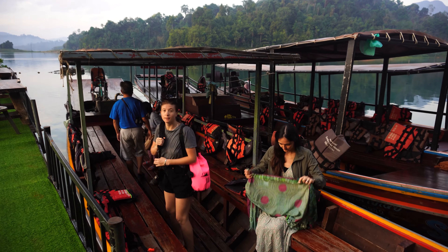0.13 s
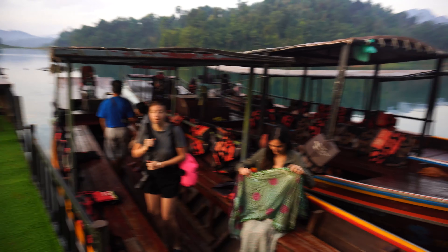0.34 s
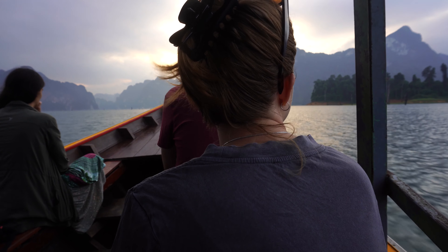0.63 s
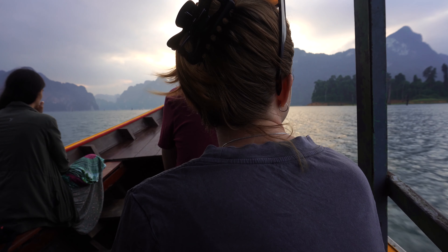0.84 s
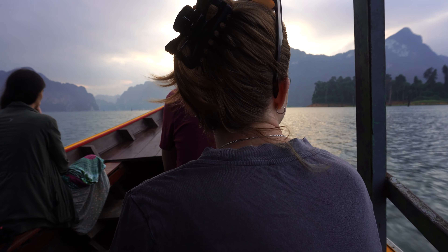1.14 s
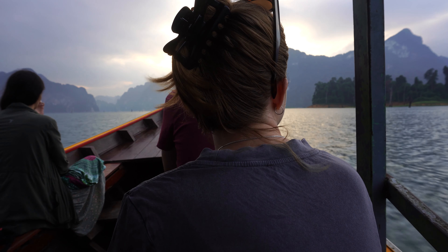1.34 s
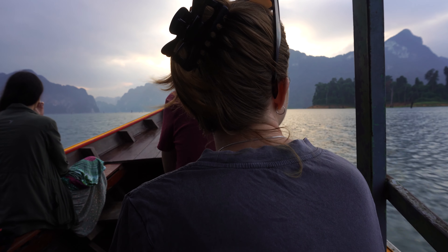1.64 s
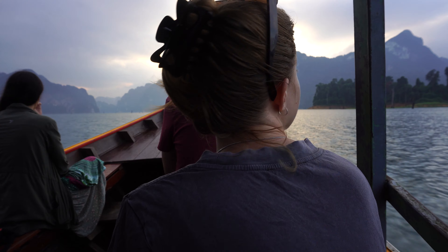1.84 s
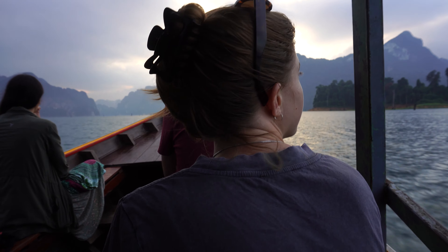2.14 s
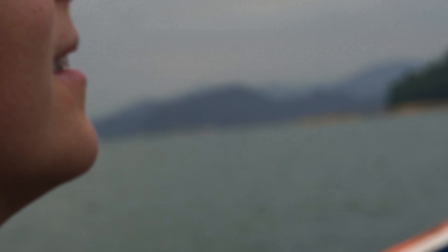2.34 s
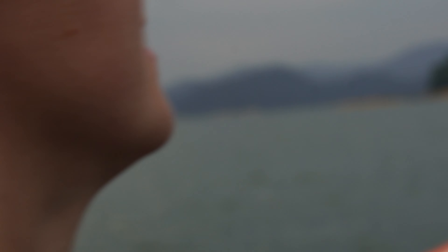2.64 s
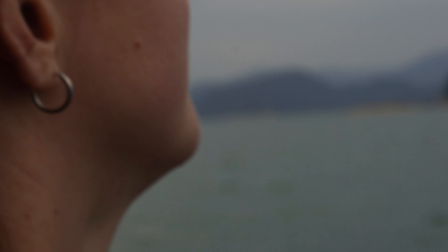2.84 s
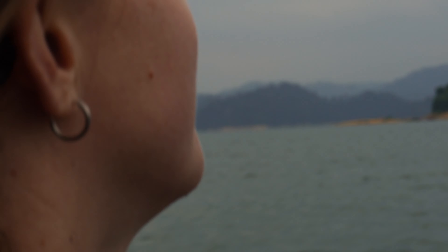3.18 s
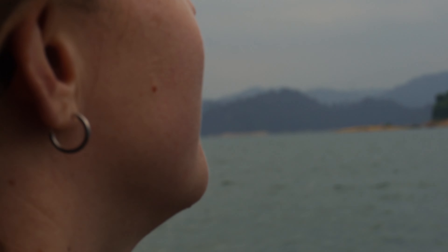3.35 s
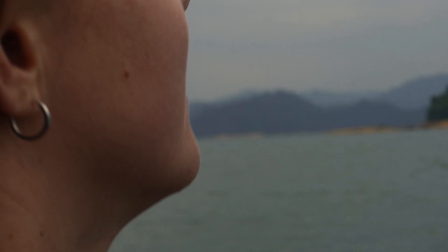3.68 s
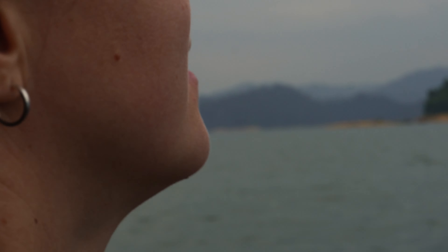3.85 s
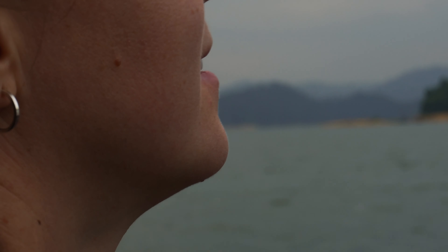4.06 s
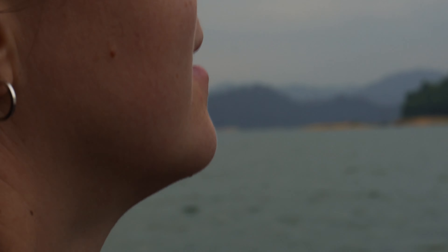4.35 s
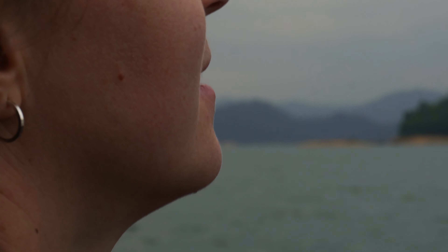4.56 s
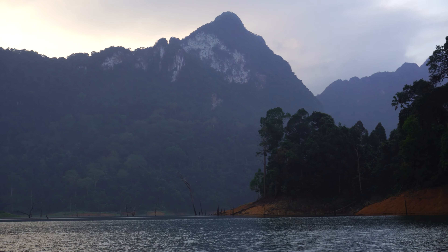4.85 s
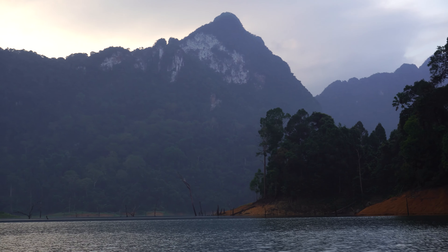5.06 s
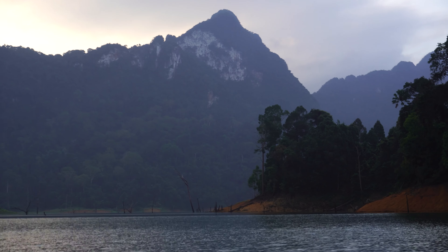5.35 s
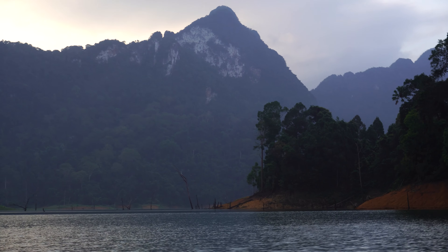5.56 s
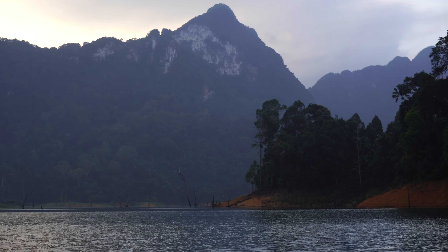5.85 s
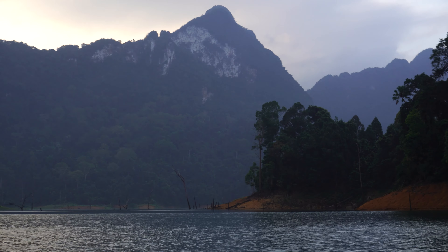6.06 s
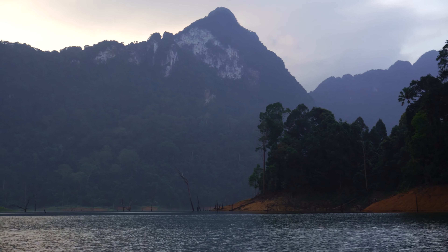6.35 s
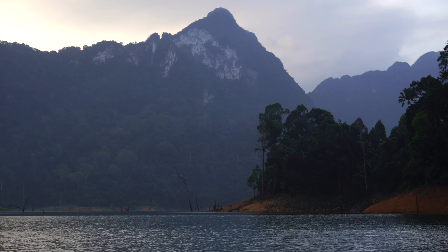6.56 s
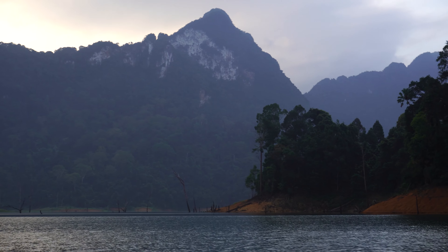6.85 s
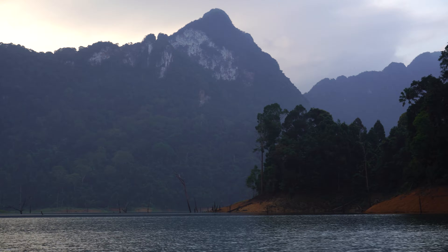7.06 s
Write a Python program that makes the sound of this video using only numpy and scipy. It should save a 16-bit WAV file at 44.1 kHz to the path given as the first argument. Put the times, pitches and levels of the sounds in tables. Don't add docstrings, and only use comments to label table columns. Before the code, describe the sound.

Outdoors on a lake, camera microphone in open air. Footsteps and a cloth rustle on hollow planks last half a second, then a hard cut to a boat cruising. Its open exhaust growls continuously with a nasal mid buzz, water hisses along the hull, and wind booms and flutters, sometimes distorting or choking. The last shot has a lower, steadier engine, dull spray and scattered drop ticks.

```python
import sys
import numpy as np
from scipy import signal
from scipy.fft import rfft, irfft, next_fast_len
from scipy.io import wavfile
from scipy.ndimage import uniform_filter1d, map_coordinates

SR = 44100
rng = np.random.default_rng(int(sys.argv[2]) if len(sys.argv) > 2 else 0)


def elevation(decibels):
    levels = np.asarray(decibels, float)
    return 10 ** (levels / 20)


def bounce(signal):
    frames = np.transpose(np.atleast_2d(signal))
    limited = np.clip(frames, -1, 1)
    pcm = np.round(limited * 32767).astype(np.int16)
    wavfile.write(sys.argv[1], SR, pcm)


N = 318402
T = np.arange(N) / SR

# start_s, end_s
SHOTS = [
    (-.1, .535),
    (.541, 4.7083),
    (4.7915, 7.3),
]
# fade_in_s, fade_out_s
FADES = [(.012, .012), (.01, .00002), (.00002, .001)]

# frequency_hz, density_db
BOARD_SPECTRUM = [(59, -18), (100, -10), (237, -6.5), (320, -5.5), (345, -4), (456, -3.5), (1200, -25),
                  (1560, -53), (2640, -120)]
# frequency_hz, density_db
SCUFF_SPECTRUM = [(400, -29), (650, -0.5), (1000, -4), (1500, -11.0), (2500, -32), (5000, -75)]
# frequency_hz, density_db
RUSTLE_SPECTRUM = [(880, -67), (1500, -34), (1680, -9), (2530, -12.5), (3680, -12.5), (5650, -17.5),
                   (6570, -24), (14000, -34)]
# start_s, boards_db, scuff_db, rustle_db
STEPS = [
    (0.305, -44, -40.5, -63),
    (.335, -60, -65, -47),
    (0.377, -36, -37.5, -44.5),
    (0.456, -36, -30, -42),
]
# boards_s, scuff_s, rustle_s
STEP_RISE = (0.0071, 0.0044, 0.0062)
# boards_s, scuff_s, rustle_s
STEP_T60 = (0.41, 0.28, 0.37)
# time_s, level_db
QUIET_BOARDS = [(0, -40), (.3, -46), (.53, -49)]
# start_s, peak_db, pitch_hz, t60_s
KNOCKS = [
    (.229, -28.5, 2010, 0.0068),
    (.2292, -32, 2800, 0.0073),
    (.2294, -30, 3580, 0.0049),
    (.309, -45, 617, .03),
    (.309, -37, 1500, .01),
    (.378, -34, 640, 0.037),
    (.457, -25, 990, .03),
]
# time_s, pitch_hz, level_db
BIRD = [(.18, 3260, -79), (.2, 3280, -54), (.25, 3310, -54), (.29, 3320, -56), (.31, 3330, -75)]

# frequency_hz, density_db
SWAY_SPECTRUM = [(4, -10.5), (10, 5.5), (22, -11.5), (35, -23), (60, -24), (120, -68), (400, -120)]
# time_s, level_db
BREEZE = [(0, -16), (.06, -24), (.12, -28), (.27, -31), (.31, -18), (.37, -19), (.45, -37), (.53, -17)]
# time_s, level_db
WIND = [(.55, -12), (.75, -13), (1.2, -11), (1.6, -21.5), (2.05, -20), (2.4, -13), (2.9, -15),
        (3.15, -11.5), (3.4, -17), (3.6, -8), (4.1, -14.5), (4.5, -12.5), (4.7, -17.5), (4.8, -8.5),
        (5.4, -16), (5.95, -13.5), (6.6, -18), (7.22, -15.5)]
# frequency_hz, density_db
BUFFET_SPECTRUM = [(3, -25.5), (10, 3.5), (30, 7.5), (50, -1.5), (80, -8.5), (120, -22), (200, -75)]
# frequency_hz, density_db
FLUTTER_SPECTRUM = [(40, -35.5), (65, -3), (100, -3), (150, -4), (200, -8.5), (260, -21), (350, -26),
                    (600, -85)]
# time_s, swell_db
THROBS = [(0.738, 3.5), (0.848, -9), (1.207, 3), (1.492, -5.5), (1.916, 2.5), (2.015, -6), (2.13, -2),
          (2.325, 3), (2.694, 5), (2.759, -10), (2.844, 8.5), (3.143, 2.5), (3.397, -0.5), (3.567, -2),
          (3.766, -3), (3.911, 3.5), (3.981, -3), (4.091, -2), (4.195, -6), (4.255, 5.5), (4.32, -1),
          (4.47, -2), (4.545, 5), (4.659, -3), (5.378, -1), (5.747, 4.0), (5.807, -14), (5.922, 3.5)]
# time_s, swell_db
FLURRIES = [(0.838, -7), (0.983, 4.4), (1.242, -2), (1.372, 4), (1.641, -7), (2.0, -3), (2.464, 2.5),
            (2.594, -2.5), (3.128, -3), (3.218, -10), (3.322, -15), (3.452, -9), (3.522, 3), (3.712, 2),
            (3.986, -5.5), (4.639, -13), (5.268, 1.5), (5.822, -1), (6.191, 4.0), (6.341, -1)]
# time_s, half_width_s, pressure (1 = full scale)
PUSHES = [
    (3.5445, .0035, -1.15),
    (4.461, .005, .3),
    (4.47, .005, .85),
    (4.707, .003, .22),
    (4.7918, .003, -.27),
    (4.835, .004, .95),
]
# start_s, end_s
STALLS = [(1.198, 1.2032), (3.5355, 3.5395), (4.2288, 4.2332), (4.4563, 4.4645)]
# time_s, gain_db
DUCKS = [
    (3.545, -17),
    (4.458, -4.5),
    (6.27, -2),
    (6.39, 1),
]

# frequency_hz, density_db
SPRAY_SPECTRUM = [(900, -22.5), (1600, -9.5), (2400, -8), (3500, -7), (4350, -12.5), (5200, -12),
                  (7300, -24), (10000, -25.5), (12300, -29.5), (15000, -35), (15750, -44), (15900, -110)]
# time_s, swell_db
WAVES = [(0.763, -2.5), (1.352, 1.5), (1.831, 2.5), (2.883, 2.5), (3.407, 1.8), (3.552, -1.5), (3.976, -2),
         (4.171, 1.5), (4.61, -3.5), (5.882, -3), (6.276, -3.5), (6.425, -1.3)]
# start_s, peak_db, pitch_hz
DROPS = [(.652, -31, 2600), (.917, -35, 2130), (2.687, -32, 2160), (2.978, -29, 3780), (3.491, -32, 3610),
         (4.517, -32, 2340), (5.348, -31, 2500), (6.02, -28, 5400), (6.135, -28, 2120), (6.479, -32, 3600),
         (6.54, -31, 4940), (6.698, -26, 3400), (6.779, -30, 2700), (7.099, -28, 3900)]

# time_s, level_db
ENGINE_LEVEL = [(.55, -32), (1.6, -31.5), (2.3, -29.5), (3.0, -30), (3.45, -30), (3.8, -31), (4.2, -30),
                (4.7, -32), (4.8, -31.5), (5.3, -31), (5.9, -32.5), (6.4, -33), (7.22, -32)]
# time_s, cycles_per_s
SPEED_A = [(0.545, 7.7226), (1.0655, 7.753), (1.586, 7.7425), (2.1065, 7.7574), (2.627, 7.755),
           (3.1475, 7.7775), (3.668, 7.7902), (4.1885, 7.7932), (4.709, 7.7961)]
SPEED_B = [(4.7917, 7.2109), (5.3988, 7.2136), (6.0058, 7.1951), (6.6129, 7.1508), (7.22, 7.0605)]
STRENGTHS_A = [-6, -1, -3, 1, -2, -5]
STRENGTHS_B = [-1, -5, -2, -3, 1, 0]
# angle_after_firing_degrees, strength_db
STROKE = [(-18, -6), (34, -7), (56, -6), (82, -6.5)]
ORDERS_A = [(30, -41.7), (36, -46), (45, -46), (46, -45.7), (74, -42), (87, -49.8), (96, -47.7),
            (108, -46.5), (111, -38.3), (114, -47), (119, -47), (120, -41.5), (122, -47), (131, -48),
            (132, -37.5), (138, -43), (144, -45), (148, -47.5), (150, -48.5), (156, -46.5), (171, -48),
            (207, -51)]
ORDERS_B = [(29, -40.1), (30, -39.8), (31, -41.2), (36, -43.5), (40, -46.4), (62, -47.8), (87, -46.9),
            (90, -50.7), (114, -45.9), (117, -48.0), (119, -47.2), (124, -45.3), (129, -43.6), (134, -46.6),
            (135, -46.4), (138, -46.4), (140, -43.5), (143, -43.3), (144, -39.5), (145, -46.4),
            (224, -54.6), (228, -54.6)]
# frequency_hz, density_db
PIPE_A = [(150, -26.5), (230, 1), (350, -5.5), (500, -15), (750, -2.5), (950, 8), (1050, 2.5),
          (1150, -10.5), (1600, -5), (2000, -28.5), (2800, -37), (5000, -73)]
PIPE_B = [(150, -34.5), (230, -14), (350, -7), (500, -14.5), (750, -5), (900, -2.5), (1050, 0.5),
          (1090, -8.5), (1400, -30), (1620, -26), (1900, -54), (2800, -28), (5000, -65)]
# frequency_hz, density_db
GAS_SPECTRUM = [(150, -24.5), (250, -2.5), (500, -5), (800, -9), (1000, -9), (1200, -9.5), (1700, -14),
                (2500, -31), (5000, -58.5)]


def unit(x):
    return x / np.sqrt(np.mean(x ** 2) + 1e-20)


def along(points, hz):
    f, v = np.transpose(points)
    return np.interp(np.log(hz + 1), np.log(f + 1), v)


def curves(rows):
    s, *cols = np.transpose(rows)
    return [np.interp(T, s, c) for c in cols]


def wobble(rate):
    coarse = T[::32]
    knots = rng.standard_normal(int(N * rate / SR) + 4)
    return np.interp(T, coarse, map_coordinates(knots, [coarse * rate]))


def swells(rows, width_s):
    coarse = T[::32]
    total_db = sum(db * np.exp(-((coarse - s) / width_s) ** 2) for s, db in rows)
    return np.interp(T, coarse, total_db)


def window(start, end, rise, fall):
    return np.clip((T - start) / rise, 0, 1) * np.clip((end - T) / fall, 0, 1)


def coloured(x, gain_db):
    m = 2 * next_fast_len(N // 2 + 8192)
    gain = elevation(gain_db(np.fft.rfftfreq(m, 1 / SR)))
    cepstrum = irfft(np.log(np.maximum(gain, 1e-6)), m)
    cepstrum[1:m // 2] *= 2
    cepstrum[m // 2 + 1:] = 0
    response = np.exp(rfft(cepstrum))
    return unit(irfft(rfft(x, m) * response, m)[:N])


def rush(spectrum, patchy_db):
    z = signal.stft(rng.standard_normal(N + 512), nperseg=512)[2]
    field = uniform_filter1d(rng.standard_normal(z.shape), size=8, axis=0)
    field = uniform_filter1d(field, size=8, axis=1)
    noise = signal.istft(z * elevation(patchy_db * unit(field)), nperseg=512)[1][:N]
    return coloured(noise, lambda hz: along(spectrum, hz))


def pings(events, cycles, edge):
    out = np.zeros(N + SR)
    t = np.arange(SR // 8) / SR
    for s, db, hz, *t60 in events:
        life = t60[0] if t60 else cycles / hz
        noise = uniform_filter1d(rng.standard_normal(len(t)), size=5)
        tone = np.sin(2 * np.pi * hz * t) + edge * noise * elevation(-60 * t / life)
        out[round(s * SR):][:len(t)] += elevation(db - 60 * t / life) * tone * np.minimum(t / 0.000066, 1)
    return out[:N]


def bird():
    hz, level_db = curves(BIRD)
    phase = 2 * np.pi * np.cumsum(hz * (1 + .004 * wobble(80))) / SR
    return elevation(level_db + 1.5 * wobble(40)) * np.sin(phase)


def jetty():
    quiet_db, = curves(QUIET_BOARDS)
    levels = np.array([elevation(quiet_db), elevation(quiet_db - 6.5), elevation(-53.5 + 0 * T)])
    rise_s, t60_s = np.c_[list(STEP_RISE)], np.c_[list(STEP_T60)]
    for s, *db in STEPS:
        since = np.maximum(T - s, 0)
        levels += elevation(np.c_[db] - 60 * since / t60_s) * np.minimum(since / rise_s, 1)
    boards = levels[0] * rush(BOARD_SPECTRUM, patchy_db=0.5)
    scuff = levels[1] * rush(SCUFF_SPECTRUM, patchy_db=2.0)
    rustle = levels[2] * rush(RUSTLE_SPECTRUM, patchy_db=0)
    return boards + scuff + rustle + bird() + elevation(1.5) * pings(KNOCKS, cycles=8, edge=0.45)


def steadied(x, span_s):
    power = uniform_filter1d(x * x, round(span_s * SR))
    return unit(x / (0.089 + np.sqrt(np.abs(power))))


def eddies(spectrum, rate, share):
    slaps = unit((rng.random(N) < rate / SR) * rng.standard_normal(N))
    mixed = np.sqrt(share) * slaps + np.sqrt(1 - share) * rng.standard_normal(N)
    return coloured(mixed, lambda hz: along(spectrum, hz))


def slow_pressure(x):
    return signal.sosfiltfilt(signal.butter(2, 200, fs=SR, output="sos"), x)


def wind():
    ashore = T < SHOTS[1][0]
    early = T < (SHOTS[1][1] + SHOTS[2][0]) / 2
    (wind_db,), (sway_db,) = curves(WIND), curves(BREEZE)
    buffet_db = np.where(ashore, sway_db, wind_db + 2.1 * swells(THROBS, width_s=0.012))
    turning_db = np.where(early, -24.5 + 1.12 * (T - SHOTS[1][0]), -14)
    flutter_db = turning_db + 0.63 * (wind_db + 13.5) + 1.63 * swells(FLURRIES, width_s=0.014)
    flutter_db = np.where(ashore, sway_db - 21, flutter_db)

    buffet = eddies(BUFFET_SPECTRUM, rate=33, share=0.48)
    quicker = coloured(buffet, lambda hz: 6 * np.clip(np.log2(hz / 48 + 1e-9), -3, 0))
    buffet = np.where(ashore, rush(SWAY_SPECTRUM, patchy_db=-3.5), np.where(early, buffet, quicker))
    flutter = steadied(eddies(FLUTTER_SPECTRUM, rate=60, share=0.48), span_s=.08)
    deeper = coloured(flutter, lambda hz: -3.5 * np.clip(np.log2(hz / 80 + 1e-9), 0, 2))
    flutter = np.where(early, flutter, deeper)

    air = elevation(buffet_db) * steadied(buffet, span_s=0.059) + elevation(flutter_db - 1.5) * flutter
    air = 1.165 * np.tanh(air / 1.13)
    slow = slow_pressure(air)
    for s, width_s, pressure in PUSHES:
        air = air + np.exp(-((T - s) / width_s) ** 2) * (pressure - slow)
    return air


def ducking_db():
    fall_s, back_s = 0.0022, 0.004
    return sum(db * np.exp(np.minimum((T - s) / fall_s, (s - T) / back_s)) for s, db in DUCKS)


def spray(engine_db):
    level_db = -45 + 0.93 * (engine_db + 31) + swells(WAVES, width_s=0.028)
    sizes = elevation(np.minimum(4 * rng.exponential(size=N), 13))
    fine = (rng.random(N) < 1500 / SR) * sizes * rng.choice([-1, 1], N)
    crackle = coloured(fine, lambda hz: along(SPRAY_SPECTRUM, hz))
    flicker = elevation(0.51 * wobble(22) + 0.67 * wobble(45))
    near = flicker * (rush(SPRAY_SPECTRUM, patchy_db=0.0) + 0.63 * crackle)
    farther = coloured(near, lambda hz: -3.5 * np.clip(np.log2(hz / 7000 + 1e-9), 0, 2))
    hiss = np.where(T >= SHOTS[2][0], farther, unit(near))
    return elevation(level_db + 4.0) * hiss + elevation(-2) * pings(DROPS, cycles=58, edge=.3)


def blows(strengths_db):
    firings = 30 + 720 / 6 * np.arange(6)
    valves = np.array([(firing + angle, db) for firing in firings for angle, db in STROKE])
    wear = rng.standard_normal(valves.shape) * [6, 2]
    return np.r_[np.c_[firings, strengths_db], valves + wear]


def engine(speed, blows, orders, pipe, contrast, climb_db, lines_db, gas_db, drift_db, scatter_db):
    start_s, end_s = speed[0][0], speed[-1][0]
    cycle = np.cumsum(curves(speed)[0] * (T >= start_s)) / SR
    running = cycle > 0
    degrees, blow_db = np.transpose(blows)
    turns = degrees / 720 - .006
    pattern = rng.choice([-1, 1], len(blows)) * elevation(contrast * blow_db)
    train = np.zeros(N + 1)
    for turn, size in zip(turns, pattern):
        place = np.clip(np.interp(np.arange(cycle[-1]) + turn, cycle, T * SR), 0, N - 1)
        whole = place.astype(int)
        size = size * elevation(drift_db * wobble(1.1)[whole] + scatter_db * rng.standard_normal(len(place)))
        train[whole] += size * (1 - place + whole)
        train[whole + 1] += size * (place - whole)
    drive = unit(train[:N] * running)

    since_middle = T - np.mean(speed, axis=0)[0]
    for k, db in orders:
        in_step = np.angle(pattern @ np.exp(-2j * np.pi * k * turns))
        level_db = db + lines_db - along(pipe, k * speed[1][1]) + 1.6 * wobble(0.744)
        level_db += climb_db * np.clip((k - 121) / 10, -1, 1) * (abs(k - 121) < 14) * since_middle
        slip_rad = 1.0 * wobble(2.0)
        drive = drive + elevation(level_db) * np.cos(2 * np.pi * k * cycle + in_step + slip_rad) * running
    beat = coloured(drive, lambda hz: along(pipe, hz))
    beat = beat / np.std(beat[round(start_s * SR):round(end_s * SR)])
    return beat + elevation(gas_db) * rush(GAS_SPECTRUM, patchy_db=1.0)


def boat():
    engine_db = curves(ENGINE_LEVEL)[0] + ducking_db()
    first = engine(SPEED_A, blows(STRENGTHS_A), ORDERS_A, PIPE_A, contrast=0.81, climb_db=1.0,
                   lines_db=20.5, gas_db=-2.5, drift_db=2.5, scatter_db=-2.5)
    second = engine(SPEED_B, blows(STRENGTHS_B), ORDERS_B, PIPE_B, contrast=1, climb_db=2.0,
                    lines_db=21, gas_db=-3, drift_db=3.0, scatter_db=0.6)
    exhaust = np.where(T >= SHOTS[2][0], second, first)
    return elevation(engine_db + 1.5) * exhaust + spray(engine_db)


def scene():
    air = wind()
    afloat = boat() + air
    shots = [jetty() + air, afloat, afloat]
    return sum(x * window(*span, *fade) for x, span, fade in zip(shots, SHOTS, FADES))[None]


def roll_off(x):
    return signal.sosfilt(signal.butter(12, 15850, fs=SR, output="sos"), x)


def record(dry):
    stall = sum(window(start, end, .0005, .0005) for start, end in STALLS)
    x = dry * (1 - stall) + slow_pressure(dry) * stall
    x = x / (1 + np.abs(x) ** 16) ** (1 / 16)
    return roll_off(x)


dry = scene()
out = record(dry)
bounce(out)
```